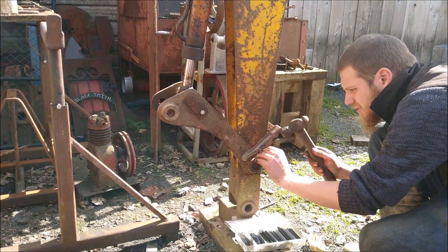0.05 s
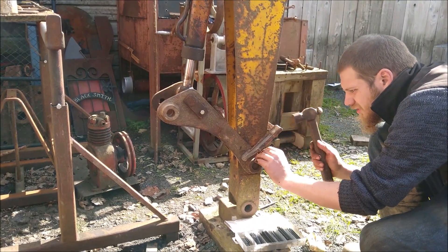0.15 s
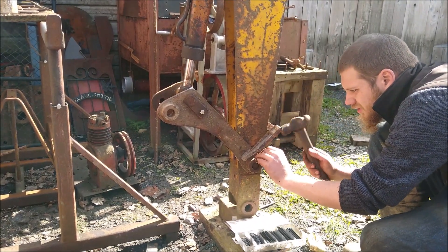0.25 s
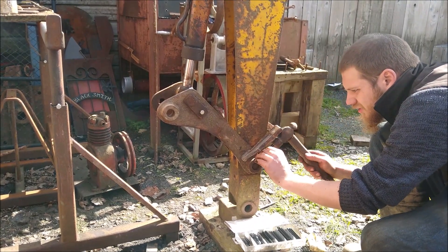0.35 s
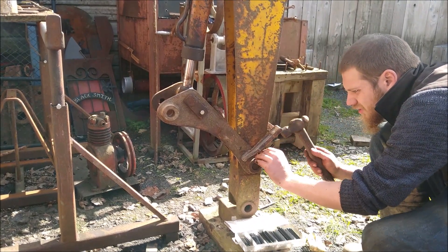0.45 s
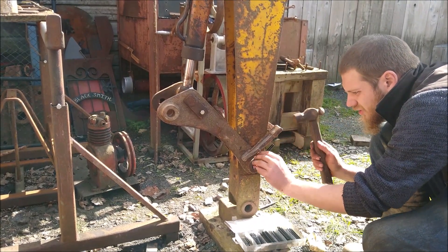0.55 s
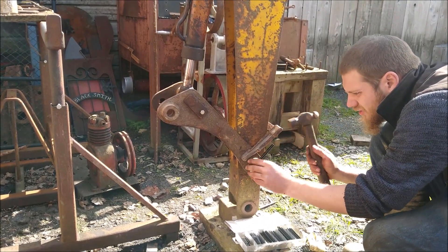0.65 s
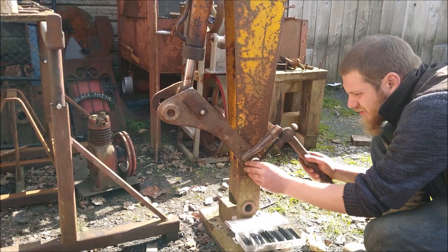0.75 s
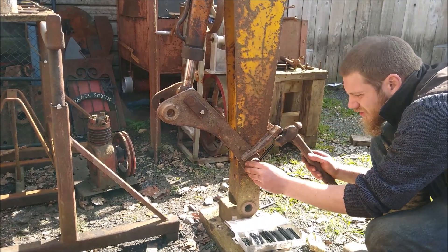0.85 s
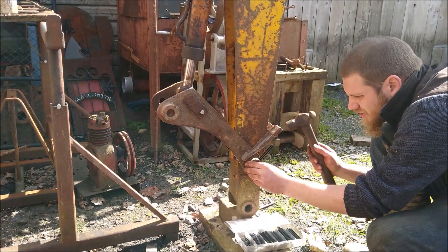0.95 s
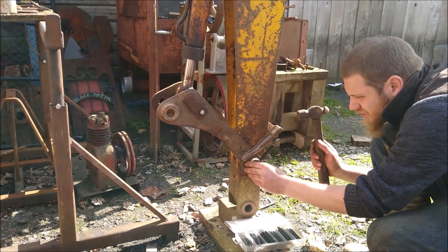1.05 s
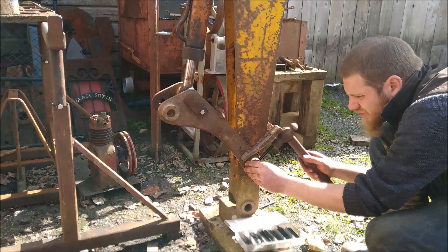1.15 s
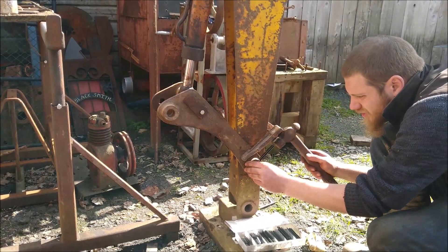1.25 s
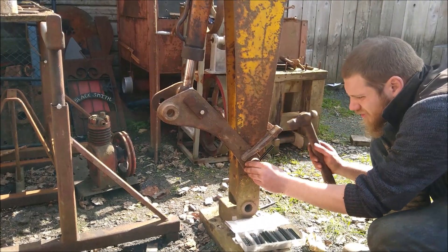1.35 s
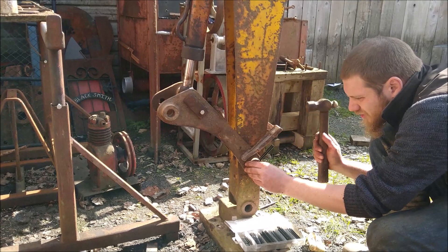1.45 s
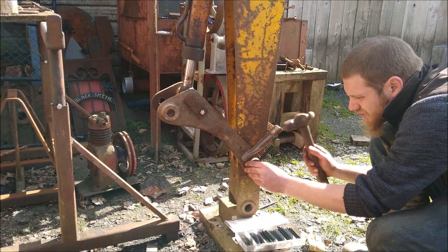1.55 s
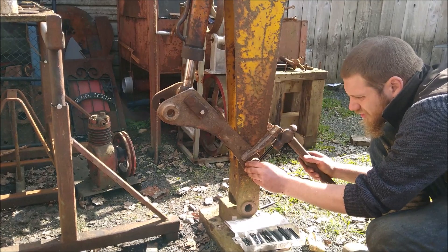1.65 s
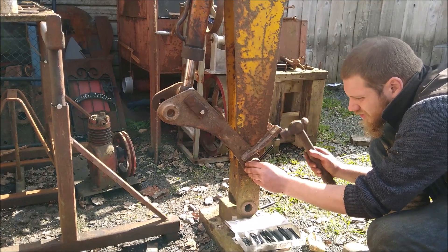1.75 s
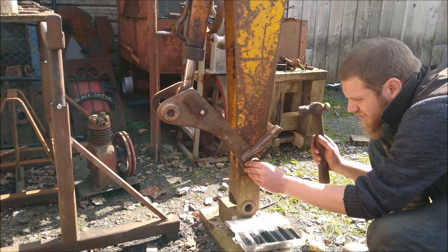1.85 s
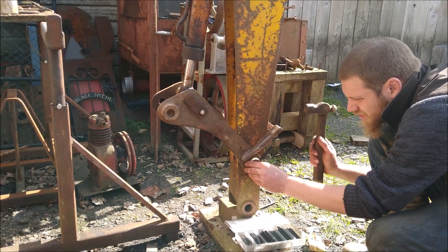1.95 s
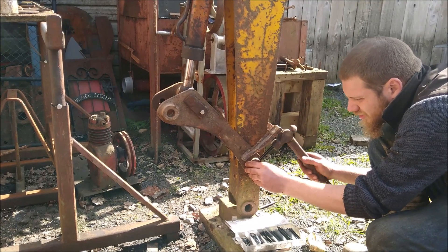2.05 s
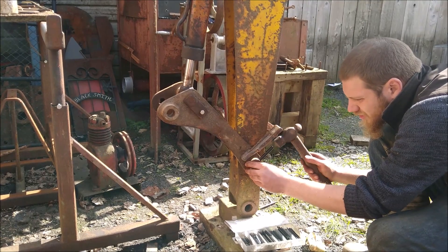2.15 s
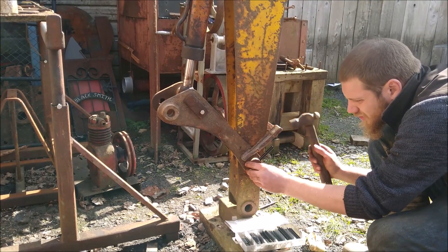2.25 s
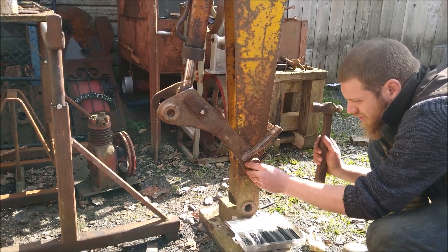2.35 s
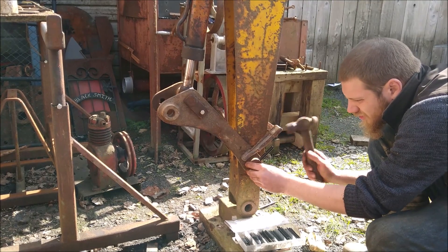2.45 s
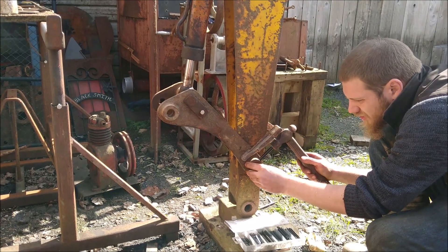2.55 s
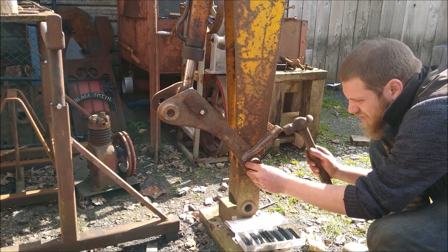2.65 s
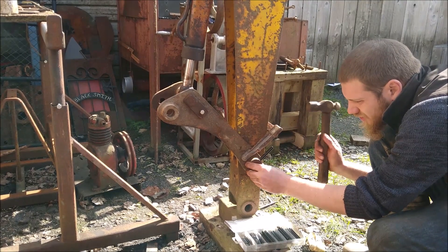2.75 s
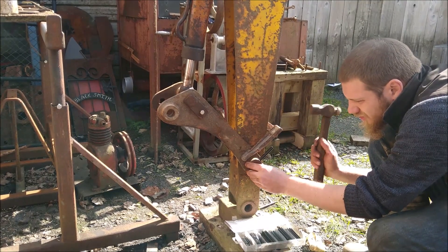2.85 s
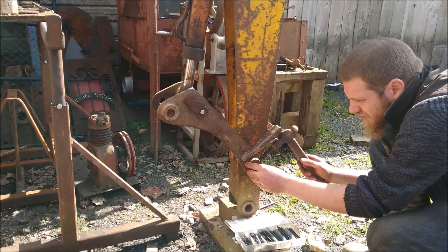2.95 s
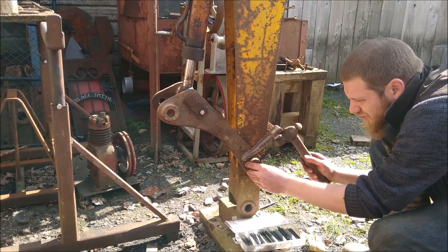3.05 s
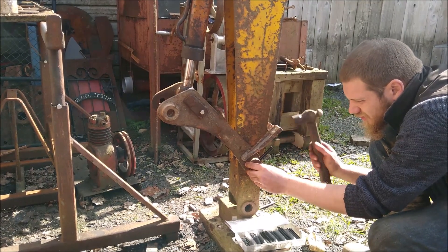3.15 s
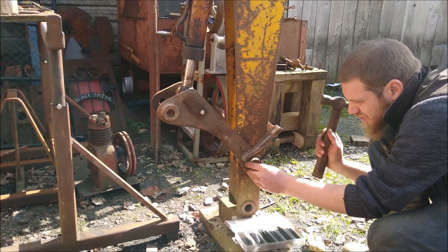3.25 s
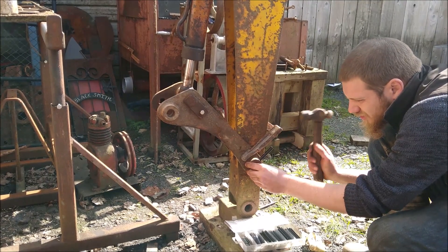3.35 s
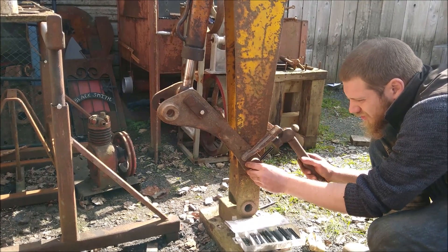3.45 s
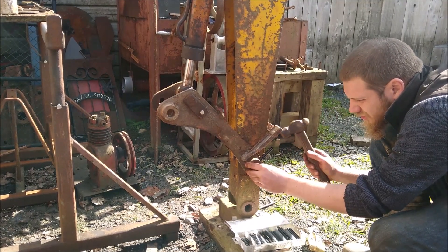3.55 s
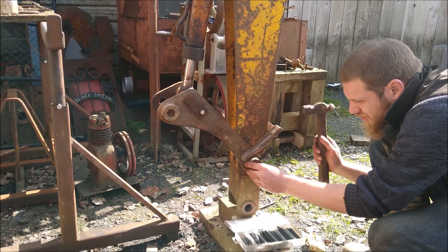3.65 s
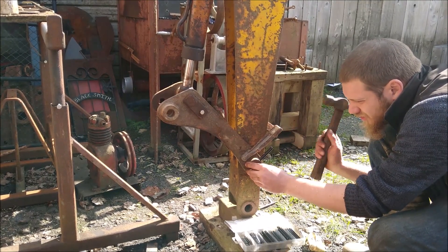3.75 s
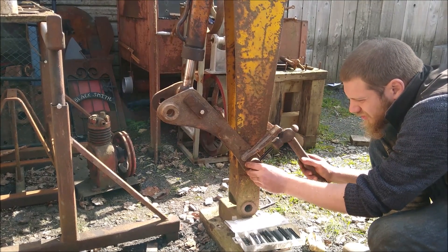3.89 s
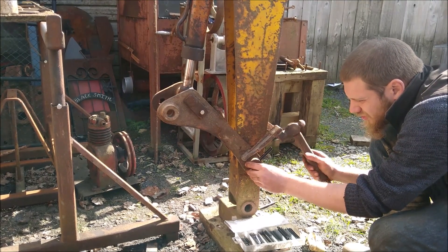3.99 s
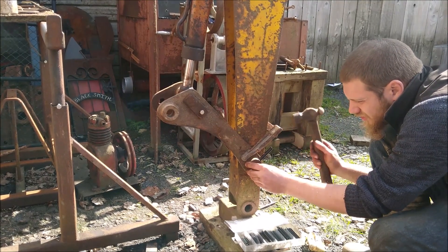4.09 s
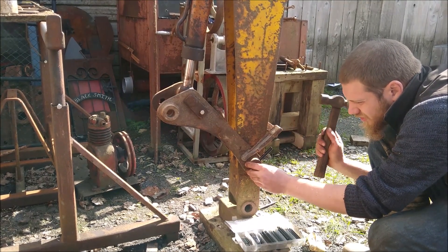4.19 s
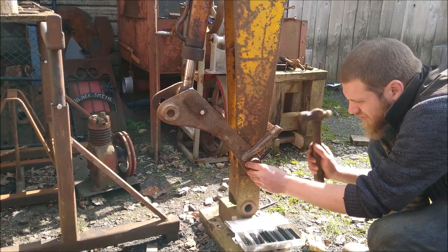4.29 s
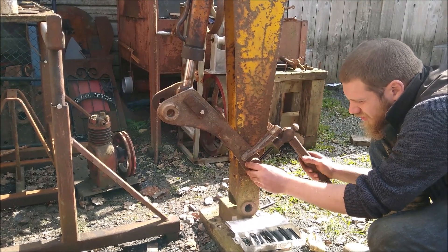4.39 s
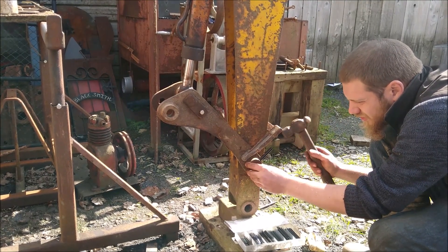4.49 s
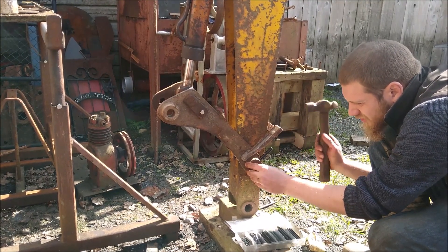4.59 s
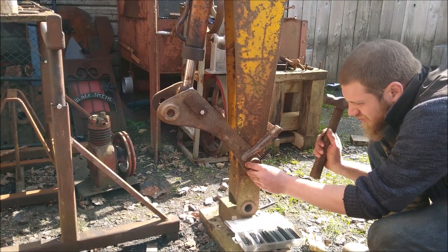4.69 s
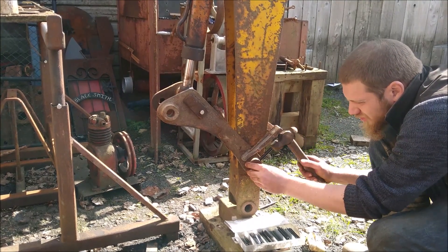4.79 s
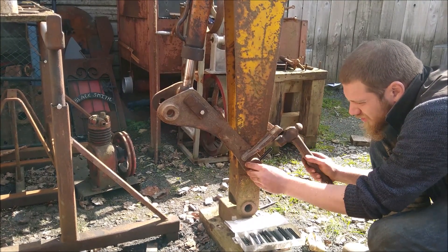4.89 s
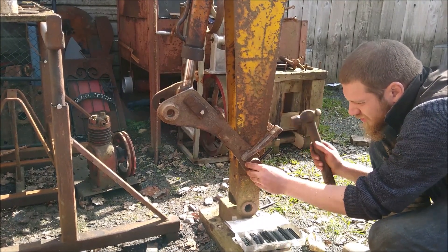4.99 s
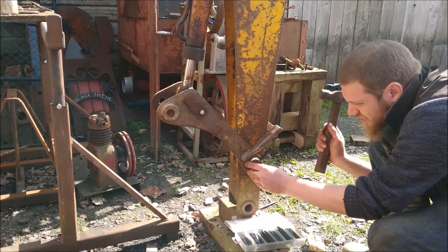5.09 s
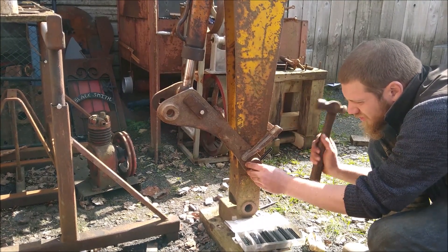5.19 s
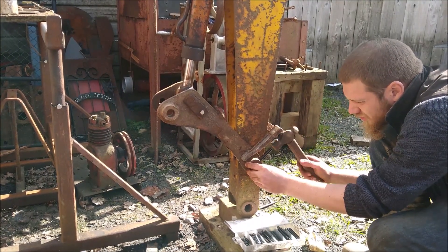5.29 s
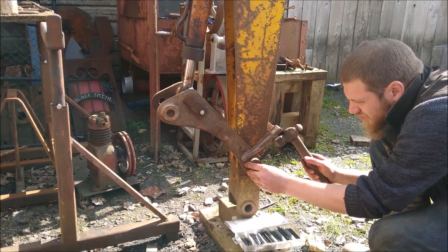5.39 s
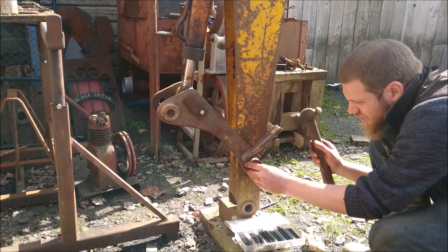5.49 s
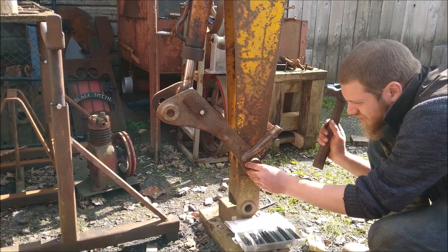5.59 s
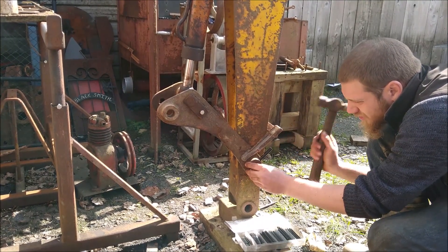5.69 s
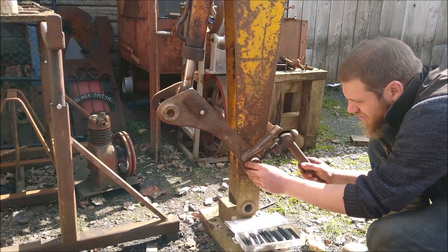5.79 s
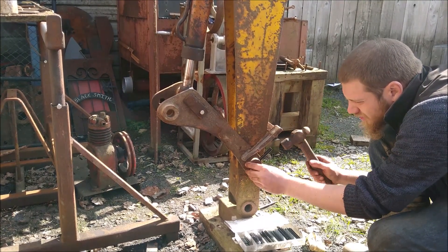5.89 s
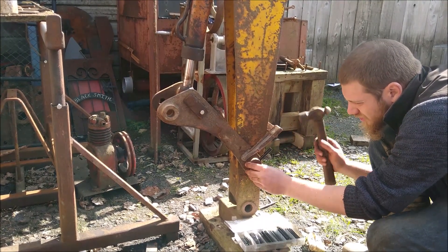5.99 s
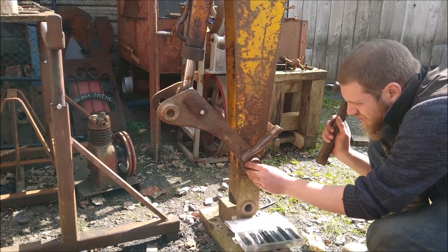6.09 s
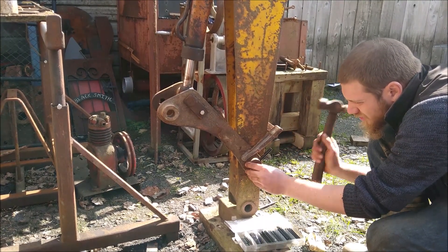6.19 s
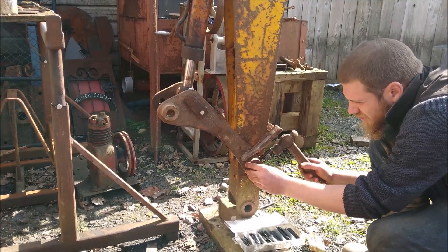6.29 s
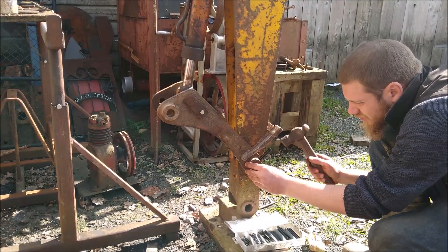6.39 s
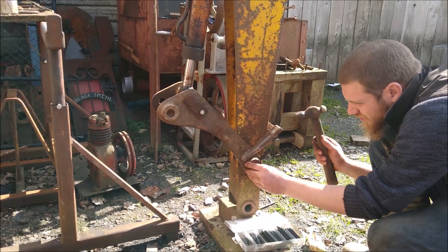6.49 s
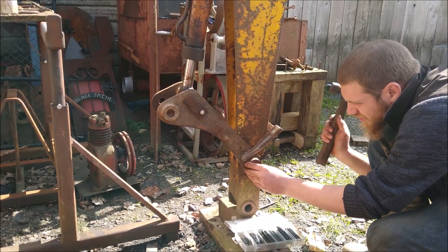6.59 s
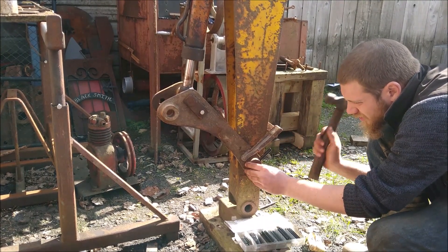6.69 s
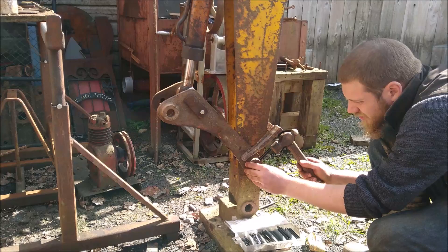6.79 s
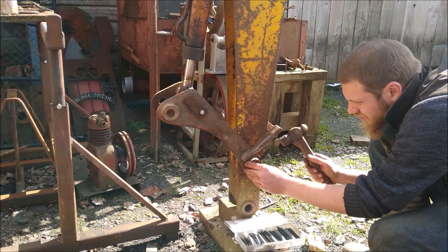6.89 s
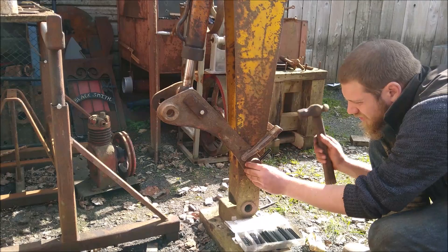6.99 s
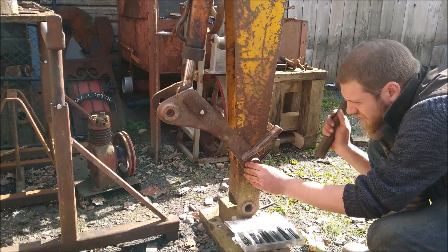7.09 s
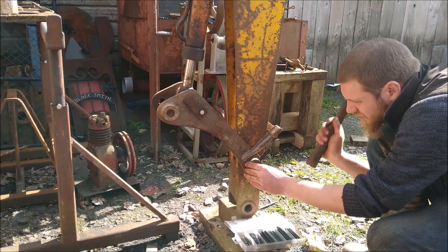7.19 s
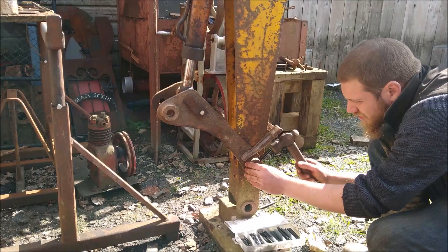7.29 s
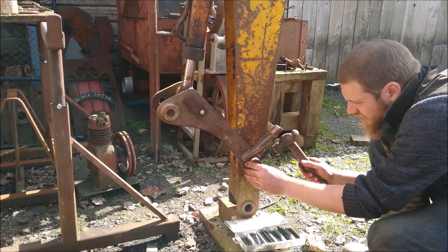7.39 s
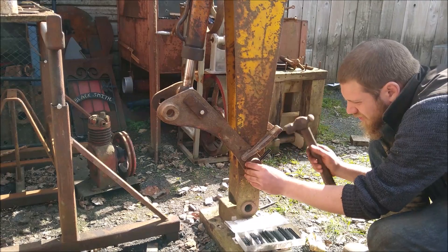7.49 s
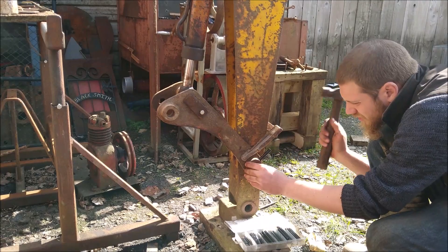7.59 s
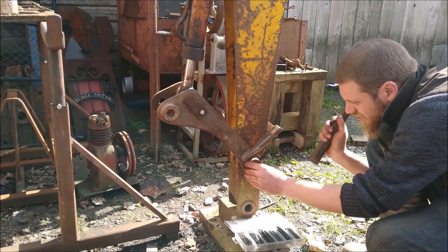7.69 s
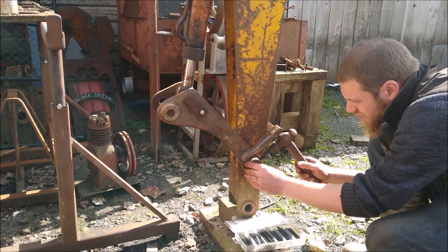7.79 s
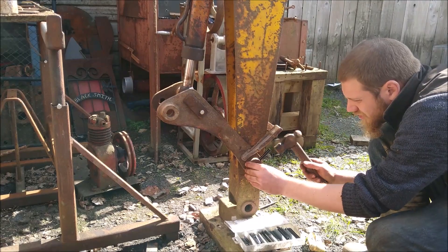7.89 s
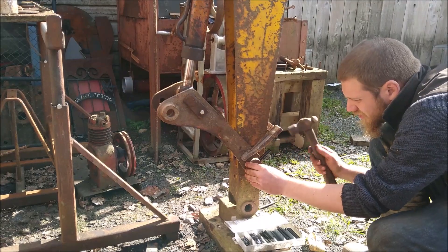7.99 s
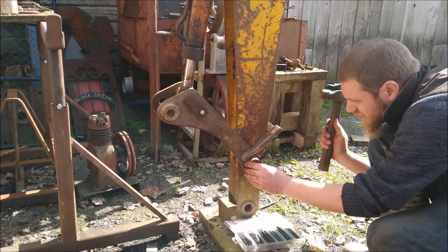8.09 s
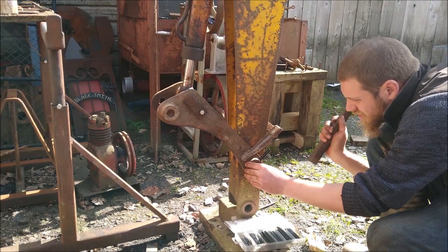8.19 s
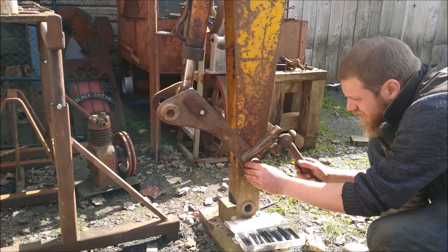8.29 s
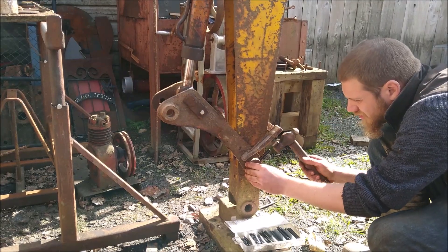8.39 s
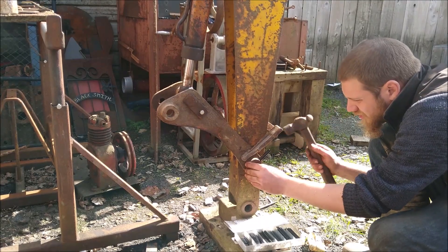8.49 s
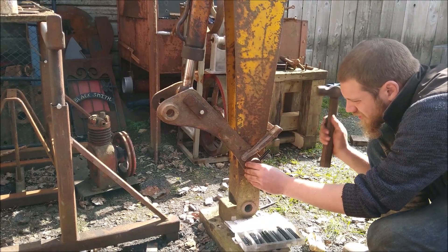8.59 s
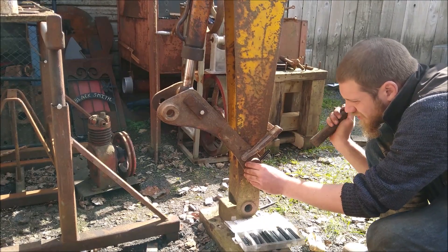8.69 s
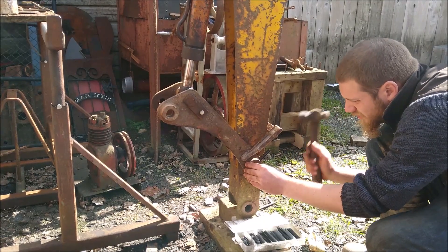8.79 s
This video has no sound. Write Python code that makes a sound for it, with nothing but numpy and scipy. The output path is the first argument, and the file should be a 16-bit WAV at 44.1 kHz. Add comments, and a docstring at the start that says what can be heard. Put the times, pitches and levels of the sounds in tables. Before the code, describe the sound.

Steady close hammering on metal in an open yard: light clanks building to hard bright clangs with piercing high pings, distant hen clucking early.

```python
"""Hammer and punch in a yard

In a yard, a hammer drives a steel punch against the pin of a digger arm, about two blows a second.
Each blow is a low thump of the overloaded microphone, a clang of the frame's damped modes and a very high sine
from the punch, damped by the hand; short noise bursts tick as the punch is reseated. A fence returns a scattered
echo, a hen calls far off in gliding harmonics, and coloured background noise, a faint motor whine and fine
crackle lie below. The near microphone saturates on the peaks."""
import sys
import numpy as np
from scipy import signal
from scipy.fft import rfft, irfft, next_fast_len
from scipy.io import wavfile
from scipy.ndimage import map_coordinates

SR = 44100
rng = np.random.default_rng(int(sys.argv[2]) if len(sys.argv) > 2 else 0)


def wrap_up_sound(samples):
    """Save the sound to the file named by the first command line argument, as 16-bit audio."""
    columns = np.atleast_2d(samples).T
    # keep every value between -1 and 1, then stretch to whole-number steps
    tamed = np.clip(columns, -1, 1)
    steps = np.round(tamed * 32767).astype(np.int16)
    wavfile.write(sys.argv[1], SR, steps)


N = 390285
T = np.arange(int(.7 * SR)) / SR  # age of a struck sound, s


def amp(db):
    """Level law: decibels to amplitude gain."""
    return 10 ** (np.asarray(db) / 20)


def unit(x):
    """Power normalization: scale to rms 1."""
    return x / np.sqrt(np.mean(x ** 2) + 1e-20)


def fade(t, t60):
    """Exponential damping: a decay of 60 dB in t60 seconds."""
    return amp(-60 * t / np.maximum(t60, 1e-3))


def along(points, hz):
    """Interpolate (Hz, value) points on a logarithmic frequency axis."""
    f, v = np.transpose(points)
    return np.interp(np.log(hz + 1), np.log(f + 1), v)


def wobble(rate):
    """Band-limited fluctuation: a smooth random curve with rate knots a second."""
    knots = rng.standard_normal(int(N * rate / SR) + 4)
    return map_coordinates(knots, [np.arange(N) * rate / SR])


def filtered(x, response):
    """Linear filtering: multiply the spectrum of x by a response of frequency."""
    n = x.shape[-1]
    m = next_fast_len(n + 8192)
    return irfft(rfft(x, m) * response(np.fft.rfftfreq(m, 1 / SR)), m)[..., :n]


def coloured(x, spectrum):
    """Spectral shaping: give x a (Hz, dB) colour, at rms 1."""
    return unit(filtered(x, lambda hz: amp(along(spectrum, hz))))


def pan(lean_db):
    """Level-difference stereo: left and right gains of mean power 1."""
    lean = np.atleast_1d(lean_db)
    gains = amp(np.array([lean, -lean]) / 2)
    return gains / np.sqrt(np.mean(gains ** 2, axis=0))


def pair(n, shared):
    """Partial coherence: two noises with a part in common."""
    z = rng.standard_normal((3, n))
    return unit(z[:2] + shared * z[2])


def add(out, s, x):
    """Superposition: mix x into out from time s on."""
    i = round(s * SR)
    x = x[:, max(-i, 0):N - i]
    out[:, max(i, 0):][:, :x.shape[1]] += x


def hammering():
    """Impact excitation: every blow wakes the same frame, while the punch's pitch creeps up."""
    # hammer blows; seat is 0 with the punch loose, 1 with it firm on the pin; lean is left minus right:
    # start_s, clang_level_db, seat, thump_level_db, thump_lean_db, punch_level_db, punch_life_s
    blows = [(-0.012,-26,0.17,-70,-4,-44,0.11), (0.4229,-24.5,0.34,-60,-8,-33,0.046),
             (0.8485,-33.5,0.2,-32,-27,-10.5,0.56), (1.2919,-29.5,0.09,-27.5,-26.5,-10.5,0.53),
             (1.7207,-27,0.49,-35,-16.5,-14,.28), (2.1673,-25.5,0.13,-33,-23,-11,0.4),
             (2.6176,-20,0.47,-33,-19,-13.5,.25), (3.0635,-20.5,0.51,-37,-19,-9.5,0.28),
             (3.536,-15,0.66,-32.5,-12.5,-11.5,0.13), (3.9977,-14,0.78,-30.5,-19,-16.5,.14),
             (4.465,-13.5,0.86,-34,-12.5,-29,0.16), (4.9193,-13.5,0.83,-32.5,-12.5,-15.5,0.17),
             (5.3842,-12,0.81,-27.5,-9,-16,.18), (5.8791,-13.5,0.87,-32.5,-8.5,-10.5,0.21),
             (6.375,-12,0.83,-31.5,-12,-29.5,.13), (6.8862,-13.5,0.21,-30,0.5,-7,0.34),
             (7.4025,-15,0.41,-35.5,-3.5,-8.5,.37), (7.9206,-12.5,0.67,-28.5,-4,-11.5,0.34),
             (8.419,-11.5,0.38,-31.5,-1,-10,0.36)]
    # spectral density of the frame's crowd of close modes: frequency_hz, density_db_per_hz
    crowd_colour = [(35, -31.5), (70, -2.5), (250, -2), (420, -2.5), (700, -1.5), (1100, -3.5), (2000, 1.5),
                    (3200, 1.5), (5200, 0.5), (6800, -4), (8300, -7.5), (10500, -1.5), (13500, -11.5),
                    (16000, -9.5)]
    # rising pitch of the punch's lengthwise mode: time_s, pitch_hz
    punch_pitch = [(0.85, 15448), (2.6, 15504), (5.4, 15521), (6.9, 15558), (8.42, 15612)]
    out = np.zeros((2, N))
    frame_noise = pair(len(T), shared=0.06)
    for s, clang_db, seat, thump_db, thump_lean_db, punch_db, life in blows:
        # part of the noise is common to all blows, part is new
        struck = strike_point(frame_noise + pair(len(T), shared=0.57))
        crowd = coloured(struck, crowd_colour)
        punch_hz = np.interp(s, *np.transpose(punch_pitch))
        add(out, s, amp(clang_db) * clang(crowd, clang_db, seat, life))
        add(out, s, amp(thump_db) * overload_thump(thump_lean_db))
        add(out, s, amp(punch_db) * punch(punch_hz, life))
    return out


def strike_point(x):
    """Modal participation: each blow lands a little elsewhere and favours other clusters of modes."""
    ripple_db, spacing_hz = 3.2, 110
    knots = rng.standard_normal(512)
    return filtered(x, lambda hz: amp(ripple_db * map_coordinates(knots, [hz / spacing_hz], mode="mirror")))


def clang(crowd, blow_db, seat, life, crack_db=3, crack_t60=0.015, tail_t60=0.46, modes_db=-16):
    """Modal decay: a crack, then close modes and a few clear ones, die at frequency-dependent rates."""
    # the frame's clear modes, punch loose or firmly seated: frequency_hz, loose_level_db, firm_level_db
    clear_modes = [(255, -7, -6), (604, -8, 3), (692, -7, -4), (728, -8, -2), (797, 2, 3), (1080, -6, -9),
                   (1355, 3, -7), (1440, -1, -10), (1793, -8, -4), (1930, -4, -8), (2010, 1, -1),
                   (2140, -7, -3), (2630, -3, -4), (3062, 2, 3), (3149, -6, -2), (3260, -3, -7),
                   (3678, -7, 0), (4090, -6, -3), (4517, -7, -1), (4995, -7, 0), (5176, -9, 0),
                   (5460, -7, -2), (7215, -4, -9), (7890, -4, -10), (8452, -10, -6), (10100, -10, -8),
                   (10485, -8, -5), (10912, -10, -5), (12922, -2, -2)]
    # damping of the close modes as a share of the clang's t60: frequency_hz, t60_share
    damping = [(100, .9), (300, 1.1), (650, 1.45), (1100, .95), (2200, 1.05), (5000, 1.03), (8000, .85),
               (15000, .8)]
    # stereo lean of the frame, left minus right: frequency_hz, lean_db
    frame_lean = [(60, -6.5), (250, -3.5), (600, 1), (1100, -3), (2200, -3.5), (4500, 0), (8500, -1),
                  (14000, -13.5)]
    # colour of the contact on a full swing: frequency_hz, level_db
    contact_colour = [(900, 0), (2000, -1), (5000, 0), (7500, 2)]
    # change of that colour for each dB the blow is lighter: frequency_hz, change_db_per_db
    lighter_change = [(300, 0.56), (800, 0.7376), (1400, 0.43), (2200, 0.3458), (3700, -.1), (5500, 0.127),
                      (7800, 0.6767), (11000, 0.11), (15000, 1)]
    full_blow_db = -10.5  # the clang of a full swing
    loose_t60, firm_t60 = 0.094, 0.24  # s; the clang lasts longer the firmer the seat
    low_mode_t60 = .22  # s; the low modes ring alike on every blow
    long_life = .32  # s; from this punch life on the tail is at its fullest
    full_tail_db, tail_loss_db = -17, 14  # fullest tail; its loss per halving of the life

    def contact_db(hz):
        """Contact spectrum: a lighter blow loses most in the middle of its spectrum."""
        return along(contact_colour, hz) + (full_blow_db - blow_db) * along(lighter_change, hz)

    t60 = loose_t60 + seat * (firm_t60 - loose_t60)
    # the tail is fainter on blows whose punch tone is short
    tail_db = full_tail_db + tail_loss_db * np.log2(min(life / long_life, 1))

    hz, t, z = signal.stft(crowd, SR, nperseg=256)
    dying = fade(t, t60 * along(damping, hz)[:, None]) + amp(crack_db) * fade(t, crack_t60)
    dying = np.hypot(dying, amp(tail_db) * fade(t, tail_t60))
    gains = pan(along(frame_lean, hz)) * amp(contact_db(hz))
    dense = signal.istft(z * dying * gains[..., None], SR, nperseg=256)[1][:, :len(T)]

    # a firmly seated punch couples to the frame: a longer clang with other modes
    firm = np.interp(seat, [.3, .8], [0, 1])
    clear = np.zeros_like(dense)
    for mode_hz, loose_db, firm_db in clear_modes:
        mode_db = loose_db + firm * (firm_db - loose_db) + 3 * rng.standard_normal()
        level_db = modes_db + mode_db + contact_db(mode_hz)
        # the low modes ring on; the high ones die with the clang
        mode_t60 = along([(1500, low_mode_t60), (3500, 1.05 * t60), (13000, .85 * t60)], mode_hz)
        swing = np.sin(2 * np.pi * (mode_hz * T + rng.random((2, 1)))) * fade(T, mode_t60)
        clear += amp(level_db) * pan(along(frame_lean, mode_hz)) * swing
    return (dense + clear) * (1 - fade(T, .002))  # soft onset


def punch(hz, life):
    """Longitudinal resonance: the punch's lengthwise mode, which the grip damps ever faster."""
    lean_db = -22.5
    tone = np.sqrt(2) * np.sin(2 * np.pi * hz * T)
    damped = fade((T / life) ** 1.6, 0.9)  # 60 dB down at 0.94 of the life
    return pan(lean_db) * tone * damped * (1 - fade(T, 0.0091))


def overload_thump(lean_db, low_hz=52, high_hz=280, rumble=0.018, rumble_t60=0.07,
                   swing_hz=66, swing_db=-5, swing_t60=0.11):
    """Microphone overload: each channel is jolted into a low bump, short rumble and decaying low swing."""
    bump = rumble * pair(len(T), shared=0.9) * fade(T, rumble_t60)
    bump[:, 0] += 1  # the impulse
    bump = signal.sosfilt(signal.butter(N=2, Wn=high_hz, fs=SR, output="sos"), bump)
    bump = signal.sosfilt(signal.butter(N=4, Wn=low_hz, btype="high", fs=SR, output="sos"), bump)
    bump /= np.sqrt(np.mean(bump[:, :SR // 25] ** 2))  # rms 1 over the first 40 ms
    swing = -amp(swing_db) * np.sin(2 * np.pi * swing_hz * T) * fade(T, swing_t60)
    return pan(lean_db) * (bump + 2 * swing)


def ticks(t60=0.011):
    """Brief contact excitation: light steel touches as the punch shifts on its seat."""
    # shifts of the punch; body is the boost below about 3.5 kHz: start_s, level_db, body_db
    contacts = [(1.12, -37, 7), (1.2645, -41, -1), (2.4077, -36.5, -4), (2.589, -37.5, 1.5),
                (2.875, -46, -5), (4.7995, -46, 1), (5.6932, -42, -4), (7.1316, -33.5, -8), (7.213, -45, 9),
                (7.3597, -46, -6.5), (7.637, -36, 2), (8.266, -48, -2)]
    # spectral density of a tick: frequency_hz, density_db_per_hz
    tick_colour = [(300, -20), (2500, -10.5), (8000, -1.5), (12000, 10.5), (16000, -3)]
    out = np.zeros((2, N))
    for s, db, body_db in contacts:
        body = [(3500, body_db), (8000, 0)]
        noise = coloured(pair(len(T), shared=0.18), tick_colour)
        contact = filtered(noise, lambda hz: amp(along(body, hz)))
        add(out, s, amp(db) * pan(-8.5) * contact * fade(T, t60))
    return out


def fence(x, echo_db=-38, scatter_t60=0.012):
    """Diffuse reflection: a weak, scattered echo from across the yard."""
    delay_s = .118
    colour = [(200, 0.5), (600, 5.5), (2000, -0.5), (5000, -4), (11000, -11.5), (15000, -26)]  # (Hz, dB)
    scatter = coloured(rng.standard_normal((2, len(T))), colour) * fade(T, scatter_t60)
    out = np.zeros((2, N))
    add(out, delay_s, signal.fftconvolve(x, scatter / np.linalg.norm(scatter[0]), axes=1))
    return amp(echo_db) * out


def hen(hen_db=-1):
    """Harmonic voicing: drawn-out, slightly hoarse calls, each one bent glide, smeared by distance."""
    # the hen's calls, levels relative to hen_db; bend is the added pitch at mid-call:
    # start_s, length_s, first_pitch_hz, last_pitch_hz, bend_hz, level_db
    calls = [(0.578, 0.33, 462, 484, 0, -65.5), (0.96, 0.27, 490, 503, 36, -52),
             (1.371, 0.11, 498, 496, 1, -56), (1.529, .17, 500, 495, -25, -56.5),
             (1.861, 0.12, 485, 545, 13.5, -51.5), (2.389, .21, 535, 520, -72.5, -61),
             (2.78, 0.17, 462, 505, 2.5, -62), (3.34, 0.2, 525, 520, -65, -65)]
    # the throat's weighting of the harmonics: frequency_hz, level_db
    throat_colour = [(480, -5.5), (1000, 2), (1500, -19.5), (2000, -19), (2500, -26), (3000, -21),
                     (3600, -31)]
    attack_s, release_s = 0.018, .035
    yard_t60 = .22  # s
    t = np.arange(N) / SR
    hz, loudness = np.zeros(N), np.zeros(N)
    for s, length, first_hz, last_hz, bend_hz, db in calls:
        on = (t >= s) & (t < s + length)
        age = t[on] - s
        glide = first_hz + (last_hz - first_hz) * age / length
        hz[on] = glide + bend_hz * np.sin(np.pi * age / length)
        loudness[on] = amp(db) * np.clip(np.minimum(age / attack_s, (length - age) / release_s), 0, 1)
    hoarse = .034 * wobble(220) + 0.015 * wobble(40)  # fast and slow pitch jitter
    phase = 2 * np.pi * np.cumsum(hz * (1 + hoarse)) / SR
    call = sum(amp(along(throat_colour, k * hz)) * np.sin(k * phase) for k in range(1, 8))
    call = call * loudness * amp(hen_db + 2.5 * wobble(35))
    yard = rng.standard_normal((2, len(T))) * fade(T, yard_t60)
    smeared = signal.fftconvolve(call[None], yard / np.linalg.norm(yard[0]), axes=1)[:, :N]
    return (call + smeared) / np.sqrt(2)


def crackle(crackle_db=-74):
    """Random point process: faint, high pinpoint ticks, about a dozen a second."""
    pops = (rng.random(N) < 12 / SR) * amp(3 * rng.standard_normal(N))
    grain = pair(SR // 50, shared=.5) * fade(T[:SR // 50], .009)
    spray = signal.fftconvolve(pops[None], grain, axes=1)[:, :N]
    return amp(crackle_db) * coloured(spray, [(3000, -26), (7000, -9), (11000, 1.5), (16000, -3.0)])


def motor_whine(whine_hz=479, whine_db=-81, octave_db=-8):
    """Frequency modulation: random jitter blurs a distant motor's tone and its octave."""
    phase = 2 * np.pi * np.cumsum(whine_hz * (1 + .02 * wobble(90))) / SR
    tone = np.sin(phase) + amp(octave_db) * np.sin(2 * phase)
    return amp(whine_db + 1.8 * wobble(27)) * tone


def background_noise():
    """Amplitude-modulated noise: a coloured, partly coherent floor whose level rises and falls."""
    # spectral density of the floor: frequency_hz, density_db_per_hz
    floor_colour = [(28, -26.5), (45, -10.5), (75, 4.5), (160, -7.5), (310, -11.5), (630, -15),
                    (1300, -22.5), (2700, -23.5), (5300, -14.5), (8000, -23), (10000, -15), (12300, -12.5),
                    (15000, -19)]
    # rise and fall of the floor as the recorder's gain changes: time_s, level_db
    floor_level = [(0, -66.5), (0.8, -67.5), (1.0, -61.5), (1.65, -59.5), (2.05, -65.5), (3.4, -66.5),
                   (6.8, -67), (8.85, -66.5)]
    level_db = np.interp(np.arange(N) / SR, *np.transpose(floor_level))
    return amp(level_db + 2.3 * wobble(15)) * coloured(pair(N, shared=0.79), floor_colour)


def scene():
    """Superposition of the blows, their echo and the yard's other sounds."""
    blows = hammering()
    return blows + fence(blows) + ticks() + hen() + crackle() + motor_whine() + background_noise()


def record(dry):
    """Saturation and band limiting: peaks bend towards full scale, then the top is cut steeply."""
    top_hz = 16200
    squashed = dry / (1 + np.abs(dry) ** 8) ** (1 / 8)
    return filtered(squashed, lambda hz: 1 / np.sqrt(1 + (hz / top_hz) ** 200))


dry = scene()
out = record(dry)
wrap_up_sound(out)
```